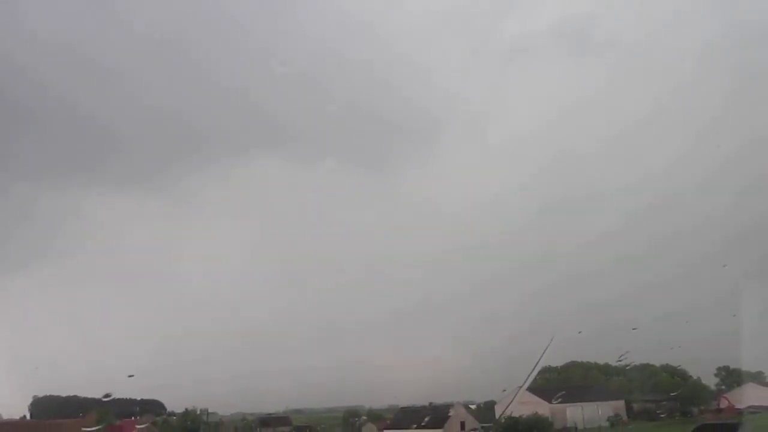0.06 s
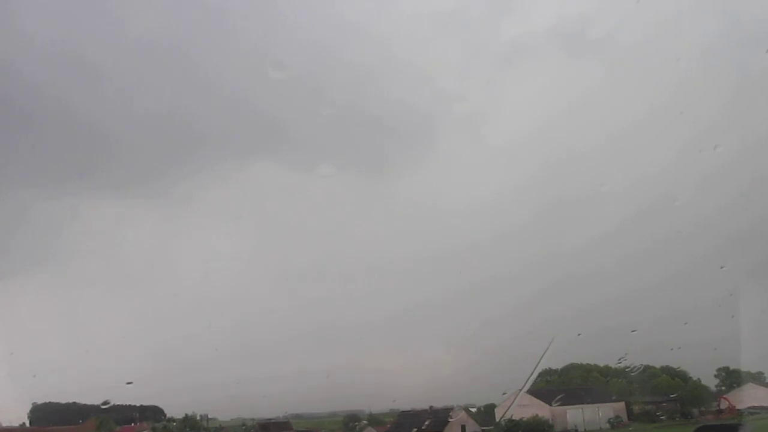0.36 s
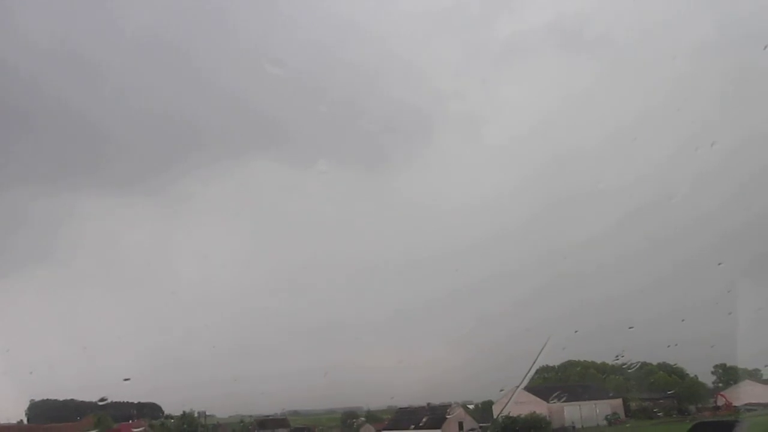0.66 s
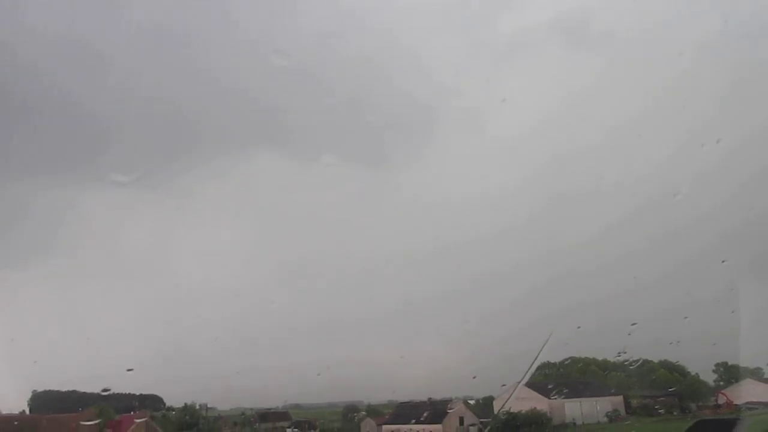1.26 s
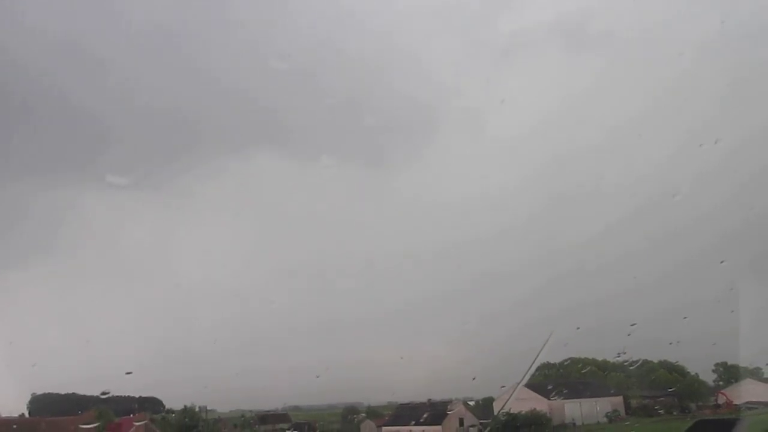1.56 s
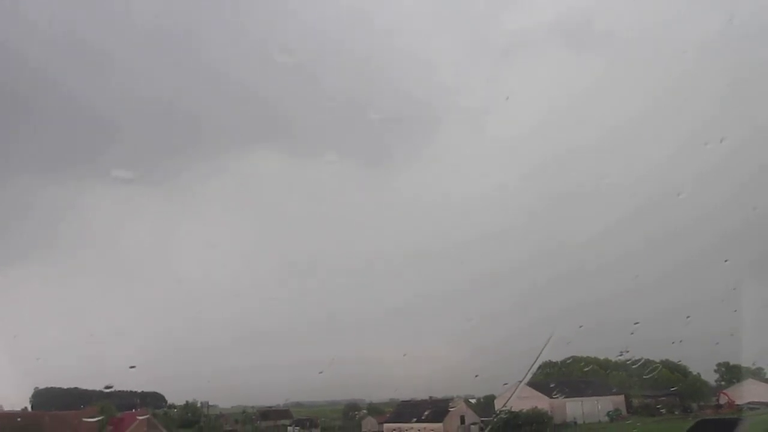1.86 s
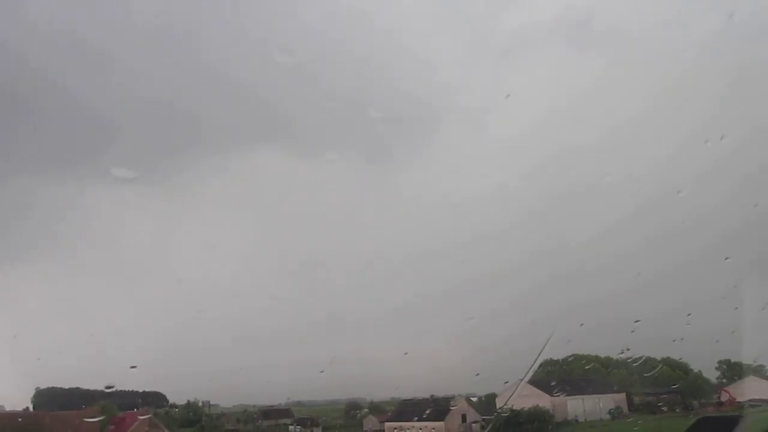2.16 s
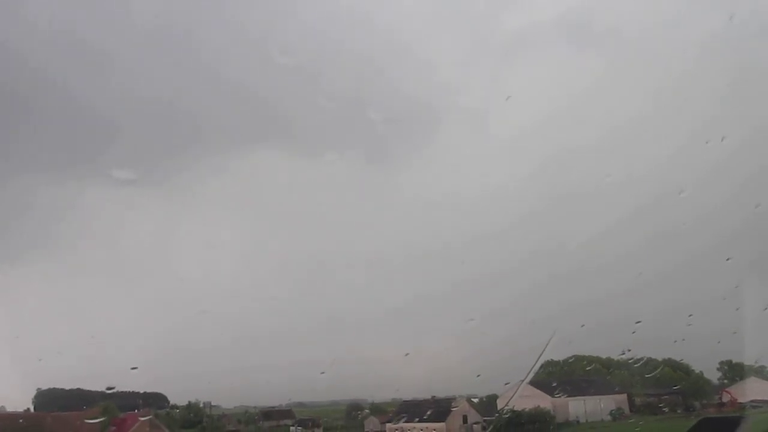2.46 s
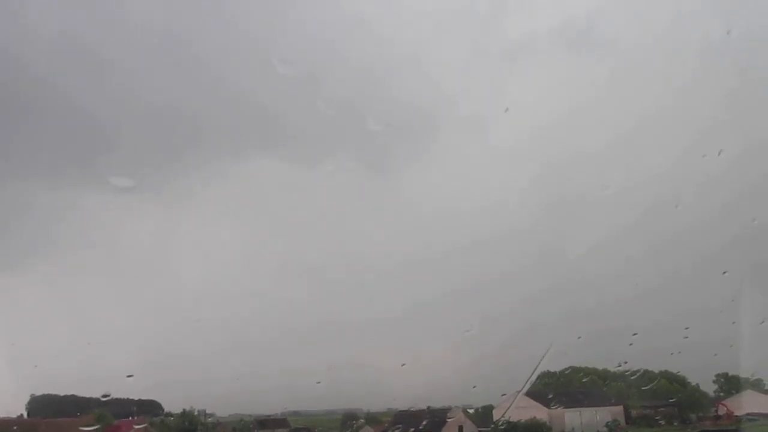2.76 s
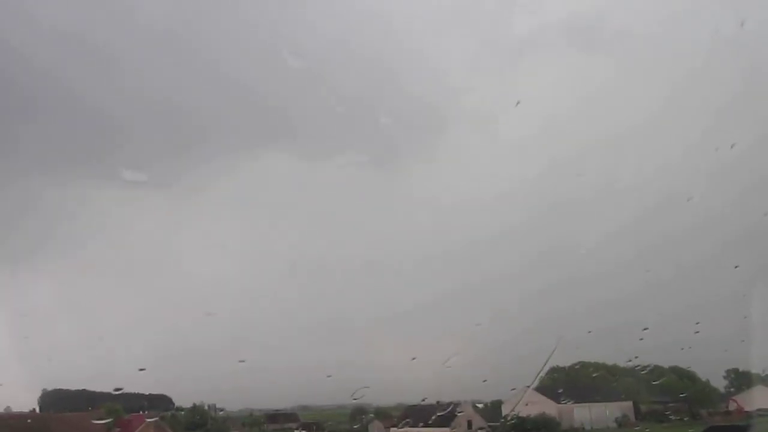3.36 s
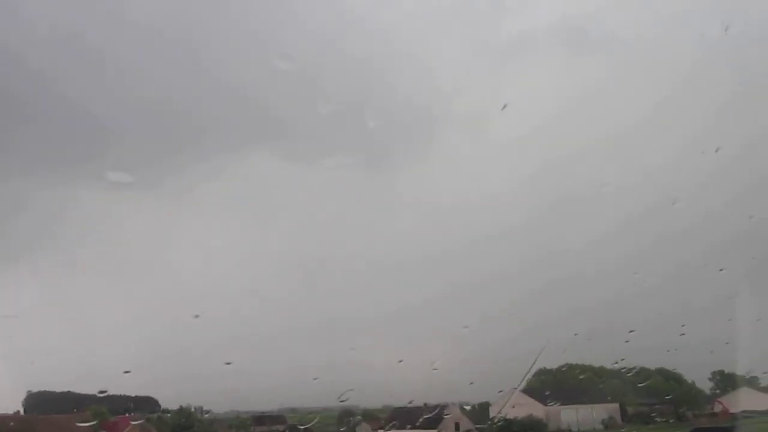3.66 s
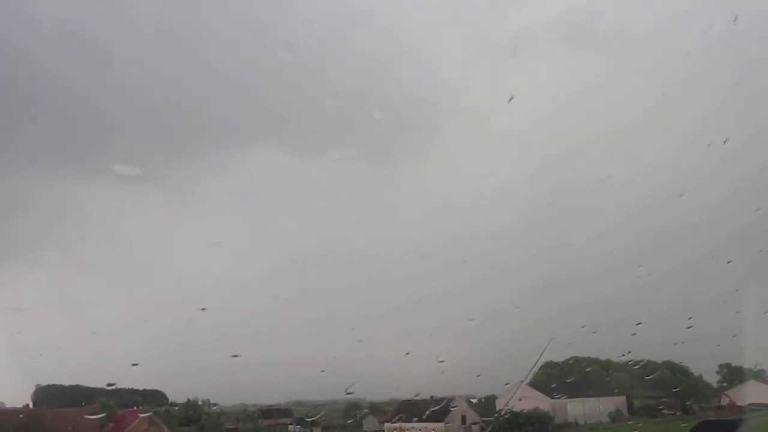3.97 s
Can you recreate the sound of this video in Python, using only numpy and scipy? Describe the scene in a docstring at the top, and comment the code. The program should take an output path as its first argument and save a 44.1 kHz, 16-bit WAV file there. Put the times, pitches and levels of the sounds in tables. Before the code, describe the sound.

Raindrops hit a window throughout the four seconds, a mix of dull knocks and sharp ticks heard from inside a small room with a faint echo. Lighter drops patter over a steady rush of far rain, and a faint hiss swells in the first second. At about 1.4 seconds distant thunder rolls in, swelling near 2.3 seconds and again near 3.6 with a few deep thumps.

```python
"""Raindrops knock dully and tick sharply on a window, heard from inside a small room.
Each drop strikes the pane or frame, which rings for a moment, and the room echoes it faintly.
Lighter drops patter all around, over the steady rush of far rain and a faint high hiss.
Distant thunder rolls in and swells twice, with a few deep thumps."""
import sys
import numpy as np
from scipy import signal
from scipy.fft import rfft, irfft
from scipy.io import wavfile
from scipy.ndimage import uniform_filter1d

SR = 44100
rng = np.random.default_rng(int(sys.argv[2]) if len(sys.argv) > 2 else 0)


def log_audio(samples):
    """Write samples as a 16-bit WAV file to the path given in sys.argv[1]."""
    # one column per channel
    frames = np.atleast_2d(samples).T
    # limit to full scale, then quantise
    limited = np.clip(frames, -1, 1)
    pcm = np.round(limited * 32767).astype(np.int16)
    wavfile.write(sys.argv[1], SR, pcm)


N = 176400  # 4 seconds

# How a drop sounds: ring width, impact strength, ring fade time, echo level, time to reach the frame.
DULL = dict(octaves=.25, strike=1.3, decay_s=.0032, room_db=-6, travel_s=.0026)
SHARP = dict(octaves=.42, strike=1.0, decay_s=.0007, room_db=-9, travel_s=.0003)
ROOM_DECAY_S, LIGHT_STRIKE = .0058, .7

# Heavy drops. Each row: time in seconds, relative level in dB, ring pitch in Hz, ring boost in dB,
# pan in dB (how much louder the left side is than the right).
KNOCK_HITS = [(.003, -8, 2900, 15, 0), (.4095, -7, 1290, 11, -4), (.63, -10.5, 1240, 4, -1),
              (.693, -4.5, 1280, 4, 4), (.7834, -5.5, 3200, 9, -6), (.822, -13, 2700, 15, -2),
              (.837, -12, 2800, 20, 4), (.8492, 0, 2290, 6.5, -1.5), (1.025, -16, 2400, 5, -2),
              (1.1431, -7.5, 2730, 16, 0.5), (1.2229, -19, 2100, 12, 1), (1.2593, -8, 2000, -4, 2),
              (1.331, -7, 3200, 1, -4), (1.3357, -5, 3360, 6, 2.5), (1.484, -6, 2680, 5, -7.5),
              (1.528, -11, 2600, -1, 8), (1.7522, -8, 2670, 11, 4), (1.8675, -8, 2600, -5, -3),
              (2.34, -7, 2580, 7, 4), (2.359, -8.5, 1200, 10, -2), (2.486, -6, 1520, 10, 1),
              (2.498, -6.5, 2240, 7, -7), (2.549, -8, 1500, -0.5, -2), (2.5828, -12, 2200, 4, 4),
              (2.796, -7.5, 2900, 0, 5.5), (2.953, -4.5, 2600, -2, -2.5), (3.0153, -17, 2600, 2, 3),
              (3.037, -2, 2880, 4, -3.5), (3.041, -4.5, 950, 25, 4), (3.109, -25, 1500, -2, 2),
              (3.1905, -4.5, 3500, 8, 6), (3.332, -6, 820, 27, -1.5), (3.366, -9.5, 1300, 6, 2.5),
              (3.41, -8.5, 1080, 13.5, -0.5), (3.4533, -7, 3000, 3.5, 3), (3.789, -8.5, 1190, 14, 9),
              (3.8335, -6.5, 1400, 1, -3), (3.9422, -6, 3000, -2, -4)]
# A knock's colour (its mix of low and high). Each row: frequency in Hz, relative level in dB.
KNOCK_COLOUR = [(100, -22), (400, 2.5), (900, 0), (1600, 3), (2100, 4), (2800, 3.5), (3800, -1.5),
                (4600, -6.5), (7000, -17.5), (11000, -25), (16000, -44)]

def knocks():
    """Heavy drops knock dully on the pane and frame."""
    return amp(-12.5) * near_drops(KNOCK_HITS, KNOCK_COLOUR, DULL)


# Sharp drops. Each row: time in seconds, relative level in dB, ring pitch in Hz, ring boost in dB,
# pan in dB.
TICK_HITS = [(.0288, -0.5, 3500, -2, -2), (.0622, -6, 6000, 11, 6.5), (.1474, -10, 6000, -3, 1),
             (.32, -12.5, 6030, 11, 3), (.5468, 0, 6400, 7, 3), (.6953, -2.5, 5500, -4, -4),
             (.7863, 1.5, 6000, 6, 5.5), (.8208, -14, 5500, 11, 3), (.852, -14, 6500, 8, 8),
             (1.2509, -9, 7000, 0, 10), (1.2813, -12, 7000, 15, 5), (1.3302, -9, 6000, 2.5, 14),
             (1.4607, -4.5, 7040, 6, -0.5), (1.484, -4.5, 5540, 3, 12), (1.8048, -2, 5200, 3, 1.5),
             (1.9376, -5, 5400, 12.5, 1.5), (2.037, -7, 5500, 4, 9), (2.074, -4, 5500, 2, 6.5),
             (2.1327, -1, 5950, 0, 2), (2.2182, -12, 6000, -3, -4), (2.36, -4.5, 6000, 3, 10),
             (2.507, 0.5, 6950, -3, 7), (2.589, -6, 8600, 11.5, -1), (2.6115, -15.5, 7000, 12, -6),
             (2.7664, -4, 8500, -4, 10), (2.7944, -5, 6750, 10, 6), (2.8123, -6, 5000, 3.5, 2),
             (2.833, 2.5, 4440, 8, 2), (2.9692, -6, 9000, 3, 0.5), (3.0153, -5, 6000, 1, -3),
             (3.1165, 0, 5500, 5, 4.5), (3.134, -3, 5500, 2, 9), (3.2017, 2.5, 12000, -3, 3),
             (3.366, -5.5, 10000, 11, 2.5), (3.4359, -4.5, 5500, -1, 4), (3.7328, -2, 6000, 0, -1.5),
             (3.834, 3, 5500, 9, 5.5), (3.9422, -6.5, 5500, 11, 7)]
# A tick's colour. Each row: frequency in Hz, relative level in dB.
TICK_COLOUR = [(200, -19), (1000, 4.5), (3000, 11), (5300, 3.5), (7200, 0.5), (7900, -5), (8600, -2.5),
               (11000, -8.5), (16000, -21)]

def ticks():
    """Drops tick on the glass with a high, very short ring."""
    return amp(-22) * near_drops(TICK_HITS, TICK_COLOUR, SHARP)


def near_drops(rows, colour, kind):
    """Plays the drops that stand out, each at its own place on the pane."""
    out = np.zeros((2, N))
    for s, db, ring_hz, ring_db, pan_db in rows:
        sound = drop(colour, ring_hz, ring_db, side=pan_db / 8, **kind)
        add(out, s - kind["travel_s"], panned(db, pan_db) * sound)
    return out


def drop(colour, ring_hz, ring_db, octaves, strike, decay_s, room_db, travel_s, side, size=4096):
    """One drop: an impact that the glass spreads into a falling chirp, a short ring and a room echo."""
    t, signed_hz = np.arange(size) / SR, np.fft.fftfreq(size, 1 / SR)
    hz, noise = abs(signed_hz), rng.standard_normal((4, size))
    ring = noise[:2] * np.exp(-t / decay_s)
    room = noise[2:] * np.exp(-t / ROOM_DECAY_S) * (1 - np.exp(-t / .0033))
    tail = np.fft.fft(unit(ring) + amp(room_db) * unit(room)) / np.sqrt(size)
    same = likeness(hz)
    tail[1] = same * tail[0] + np.sqrt(1 - same ** 2) * tail[1]
    # The nearer side hears the impact first (side 1 is left, -1 is right).
    lag_s = .00008 * (2 + np.clip(side, -1, 1) * np.array([[-1], [1]]))
    impact = strike * np.exp(-2j * np.pi * signed_hz * lag_s)
    # Bending waves in glass carry high notes fastest; 3000 Hz arrives after travel_s.
    bend = np.exp(-2j * np.pi * 2 * travel_s * np.sign(signed_hz) * np.sqrt(3000 * hz))
    octaves_away = np.log2((hz + 1) / ring_hz)
    gain = amp(read(colour, hz) + ring_db / (1 + (octaves_away / octaves) ** 2))
    glass = np.exp(np.conj(signal.hilbert(np.log(gain))))  # rings only after the hit
    return unit(np.fft.ifft((impact + tail) * glass * bend).real) / np.sqrt(size)


# The tones of one fat drop. Each row: pitch in Hz, level in dB, fade time in seconds, pan in dB.
FAT_DROP_TONES = [(260, -25, 0.0065, 4), (1270, -28.5, 0.0012, 7), (2740, -25.5, 0.00043, -11.5),
                  (5070, -24, 0.00083, -5), (7000, -32, .0005, -12), (8940, -28, 0.00035, -12)]

def fat_drop(start_s=2.7539, top_hz=10400, room_db=-8, size=4096):
    """A close drop: bright tones on the right that die at once, a low bump and a faint room echo."""
    t, ring, out = np.arange(size) / SR, np.zeros((2, size)), np.zeros((2, N))
    for k, (hz, db, decay_s, pan_db) in enumerate(FAT_DROP_TONES):
        ring += (-1) ** k * panned(db, pan_db) * np.exp(-t / decay_s) * np.sin(2 * np.pi * hz * t)
    ring = signal.sosfilt(signal.butter(4, top_hz, fs=SR, output="sos"), ring)
    room = unit(rng.standard_normal((2, size)) * t * np.exp(-2 * t / ROOM_DECAY_S)) / np.sqrt(size)
    echo = signal.fftconvolve(ring, room, axes=1)[:, :size]
    add(out, start_s, ring + amp(room_db) * echo)
    return out


# The colour of lighter drops. Each row: frequency in Hz, relative level in dB.
PATTER_COLOUR = [(100, -6), (400, -9), (800, -7), (1150, -1.5), (1700, -1.5), (2100, -4.5), (2800, -3.5),
                 (3800, -7), (4600, -10), (7000, -19.5), (11000, -27.5), (16000, -52)]

def patter():
    """Lighter drops tap all over the pane and frame."""
    spots = [drop(PATTER_COLOUR, hz, ring_db=10.5, octaves=DULL["octaves"], strike=LIGHT_STRIKE,
                  decay_s=.0066, room_db=-1.5, travel_s=DULL["travel_s"] * rng.random(),
                  side=rng.uniform(-.79, 1))
             for hz in np.geomspace(550, 3600, 32)]
    return amp(-51) * shower(spots, per_s=280, spread_db=4.5)


def spray():
    """Tiny droplets prickle on the glass like very soft ticks."""
    soft = dict(SHARP, strike=LIGHT_STRIKE)
    spots = [drop(TICK_COLOUR, hz, ring_db=-.5, side=rng.uniform(-1.15, 1), **soft)
             for hz in np.geomspace(3000, 9000, 20)]
    return amp(-60) * shower(spots, per_s=75, spread_db=7.5)


def shower(spots, per_s, spread_db):
    """Drops of random size land on random spots; the rain's strength scales the base rate per_s."""
    drops_so_far = np.cumsum(amp(rain_db())) * per_s / SR
    total, out = drops_so_far[-1], np.zeros((2, N))
    chances = rng.random((4000, 4))[:int(total)]
    for k, (delay, weight, spot, side) in enumerate(chances):
        s = np.searchsorted(drops_so_far, (k + 6 * delay) % total) / SR
        db = spread_db * min(-np.log(weight), 2.2)  # many quiet drops, few loud ones
        add(out, s, panned(db, 22 * (side - .5)) * spots[int(spot * len(spots))])
    return unit(out)


# How hard it rains. Each row: time in seconds, relative strength in dB.
RAIN_STRENGTH = [(0, -1.5), (.1, -2.5), (.2, .5), (.32, -2.5), (.43, 1), (.62, -1.5), (.76, 2.5), (.89, -2),
                 (1.15, -1.5), (1.45, -0.5), (1.9, .5), (2.2, -1), (2.52, 3.5), (2.7, 1.5), (2.9, -1.5),
                 (3.08, -1), (3.22, 2), (3.45, -0.5), (3.75, -0.5), (4, 3.5)]

def rain_db():
    """The rain grows and eases from moment to moment."""
    return curve(RAIN_STRENGTH)


# Flurries of rain. Each row: time of the peak in seconds, half width in seconds, level in dB.
RAIN_FLURRIES = [(0.206, 0.03, -48.5), (0.414, 0.0067, -41), (0.447, 0.0092, -43.5), (0.509, 0.0065, -45),
                 (0.752, 0.032, -46.5), (0.941, 0.011, -45)]
# The drumming's colour. Each row: frequency in Hz, relative level in dB.
DRUM_COLOUR = [(50, -39), (120, -10), (185, 9), (260, -11), (480, 4), (800, -5), (1500, -7), (4000, -37)]

def drumming():
    """Flurries of rain set the window drumming dully for a moment."""
    t = np.arange(N) / SR
    level = sum(amp(db) * np.exp(-.5 * ((t - s) / width) ** 2) for s, width, db in RAIN_FLURRIES)
    return level * wide_noise(DRUM_COLOUR)


# The thunder's colour. Each row: frequency in Hz, relative level in dB.
THUNDER_COLOUR = [(12, -38), (35, -24), (52, -12.5), (74, -17), (86, -11.5), (104, 2), (140, -0.5),
                  (215, -6), (255, -3.5), (285, -7.5), (305, -3), (328, -7), (365, -15), (480, -14.5),
                  (700, -23), (1100, -29.5), (2500, -60)]
# How the roll swells. Each row: time in seconds, level in dB before the boosts below.
ROLL_LEVEL = [(0, -70), (1.15, -58), (1.36, -52.5), (1.42, -41.5), (1.6, -43), (1.67, -40.5), (1.74, -44.5),
              (1.86, -39), (1.9, -38), (2.12, -35.5), (2.18, -38.5), (2.28, -33.5), (2.4, -36.5),
              (2.72, -36), (2.88, -39.5), (3.16, -39.5), (3.42, -41), (3.56, -32.5), (3.72, -33),
              (3.82, -33.5), (4, -35)]
# How its tone shifts. Each row: time in seconds, upper part's boost in dB, deep part's boost in dB.
ROLL_BOOSTS = [(1.4, -5.5, 3), (1.68, 7.5, -8), (1.9, 2, 7), (2.1, 1.5, 5), (2.32, 1.5, 4), (2.6, -1, 8),
               (2.85, 1, -2), (3.2, 2, 0), (3.6, -3, -3), (3.8, -1, 2), (4, 6, -2)]
# Single thumps. Each row: time of the middle in seconds, level in dB, pitch in Hz.
THUNDER_THUMPS = [(1.679, -29, 267), (1.896, -30.5, 204), (2.021, -38, 284), (2.115, -31, 307),
                  (2.267, -25, 122), (2.571, -27.5, 286), (3.555, -24, 144), (3.6445, -15.5, 162),
                  (3.822, -22.5, 133)]

def thunder(upper_hz=280, deep_hz=66, thump_cycles=.79):
    """Countless far shocks merge into a roll; a few arrive as single deep thumps."""
    t, boosts = np.arange(N) / SR, np.array(ROLL_BOOSTS)
    roll = wide_noise(THUNDER_COLOUR)
    roll /= np.sqrt(uniform_filter1d((roll ** 2).mean(0), size=3000))  # evens out chance swells
    upper = signal.sosfiltfilt(signal.butter(2, upper_hz, "high", fs=SR, output="sos"), roll)
    deep = signal.sosfiltfilt(signal.butter(2, deep_hz, fs=SR, output="sos"), roll, padtype="even")
    upper_change = upper * (amp(curve(boosts[:, [0, 1]])) - 1)
    deep_change = deep * (amp(curve(boosts[:, [0, 2]])) - 1)
    out = amp(curve(ROLL_LEVEL)) * (roll + upper_change + deep_change)
    for s, db, hz in THUNDER_THUMPS:
        cycles = (t - s) * hz
        out -= amp(db) * np.exp(-.5 * (cycles / thump_cycles) ** 2) * np.sin(2 * np.pi * cycles)
    return out


# The far rain's colour. Each row: frequency in Hz, relative level in dB.
FAR_RAIN_COLOUR = [(20, -21), (60, -5.5), (110, -0.5), (190, 5), (300, 0), (500, 4), (690, -4), (780, 2.5),
                   (1050, -12.5), (1700, -12.5), (2800, -17), (4000, -20.5), (4650, -35), (5400, -14),
                   (6000, -26), (7400, -26), (7850, -43), (8200, -29), (10000, -35.5), (12700, -31.5),
                   (13400, -33), (14000, -41), (15500, -45)]

def far_rain():
    """Far rain on roofs and ground merges into a rush that sways with the rain's strength."""
    return amp(-49.5 + .7 * rain_db()) * wide_noise(FAR_RAIN_COLOUR)


# How the hiss swells. Each row: time in seconds, level in dB.
HISS_SWELL = [(0, -85), (.3, -73), (.53, -63.5), (.65, -68), (.8, -65.5), (1.0, -60), (1.13, -60.5),
              (1.25, -70), (1.6, -70), (4, -100)]
# The hiss's colour. Each row: frequency in Hz, relative level in dB.
HISS_COLOUR = [(1000, -36), (4000, 6), (6500, 5), (9000, 2.5), (12000, 1), (13500, -4), (15500, -8)]

def hiss():
    """A faint high hiss swells and fades, a little to the left."""
    return panned(curve(HISS_SWELL), pan_db=3) * wide_noise(HISS_COLOUR)


# How alike left and right sound. Each row: frequency in Hz, likeness from 0 (unrelated) to 1 (same).
EAR_LIKENESS = [(30, 1), (130, 0.99), (260, 0.96), (500, 0.91), (1000, 0.75), (2000, 0.5), (4000, 0),
                (16000, 0)]

def likeness(hz):
    """Low notes are alike on both sides; high notes are not."""
    return read(EAR_LIKENESS, hz)


def wide_noise(colour):
    """Stereo noise of a given colour, centred in the bass and wide in the treble."""
    hz = np.fft.rfftfreq(N, 1 / SR)
    mid, side = rfft(rng.standard_normal((2, N)))
    mid, side = mid * np.sqrt(1 + likeness(hz)), side * np.sqrt(1 - likeness(hz))
    return unit(irfft(np.array([mid + side, mid - side]) * amp(read(colour, hz)), N))


def amp(db):
    """Turns decibels into a gain."""
    return 10 ** (np.asarray(db) / 20)


def panned(db, pan_db):
    """Left and right gains, with the left louder by pan_db."""
    return amp(db + pan_db * np.array([[.5], [-.5]]))


def unit(x):
    """Scales a sound to an average (rms) level of 1."""
    return x / np.sqrt(np.mean(x ** 2) + 1e-20)


def read(points, hz):
    """Reads between a table's rows on a log-frequency scale."""
    row_hz, value = np.transpose(points)
    return np.interp(np.log(hz + 1), np.log(row_hz + 1), value)


def curve(points):
    """Reads a time table at every sample."""
    return np.interp(np.arange(N) / SR, *np.transpose(points))


def add(mix, s, sound):
    """Adds a stereo sound at s seconds."""
    part = mix[:, max(round(s * SR), 0):][:, :sound.shape[1]]
    part += sound[:, :part.shape[1]]


def scene():
    """Thunder and far rain behind the drops on the window."""
    outside = thunder() + far_rain()
    return outside + knocks() + ticks() + fat_drop() + patter() + spray() + drumming() + hiss()


def record(dry):
    """Cuts the highest treble, above 15800 Hz."""
    low_pass = signal.firwin(511, 15800, window=("kaiser", 9), fs=SR)
    return signal.oaconvolve(dry, low_pass[None], "same")


dry = scene()
out = record(dry)
log_audio(out)
```